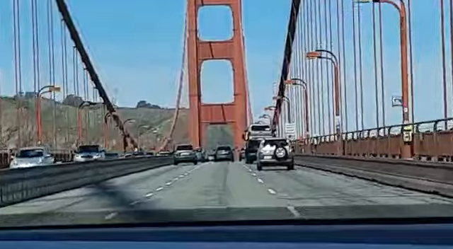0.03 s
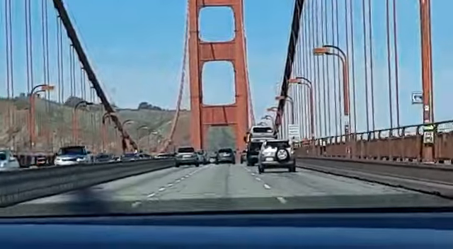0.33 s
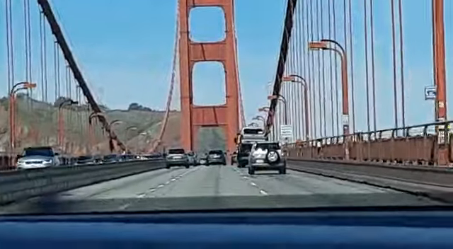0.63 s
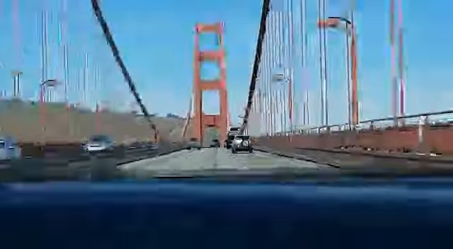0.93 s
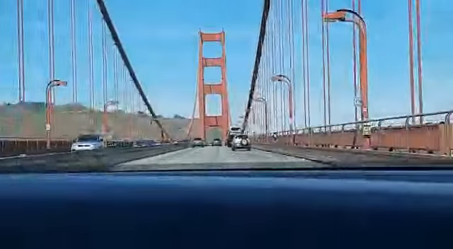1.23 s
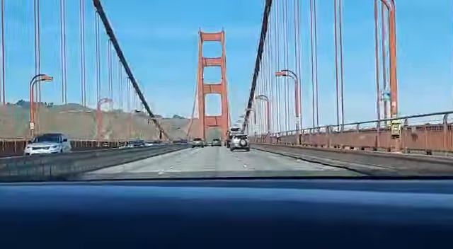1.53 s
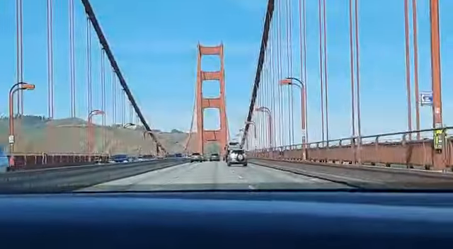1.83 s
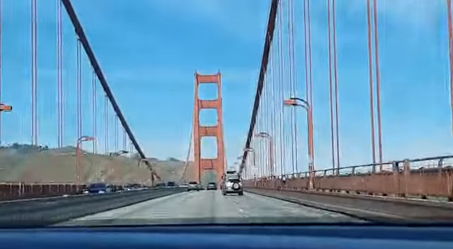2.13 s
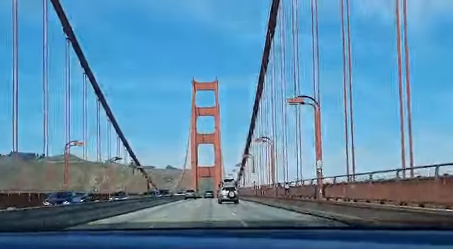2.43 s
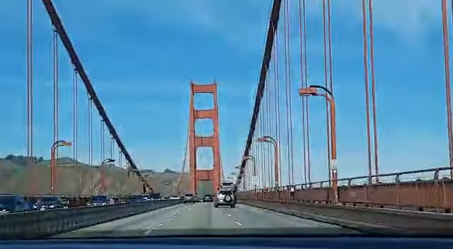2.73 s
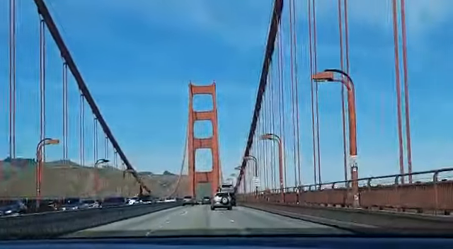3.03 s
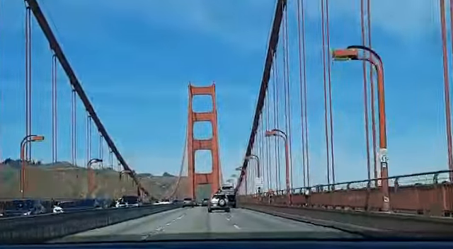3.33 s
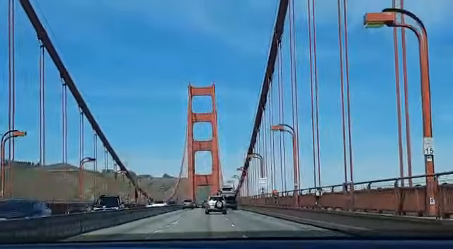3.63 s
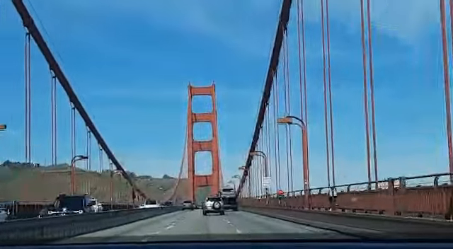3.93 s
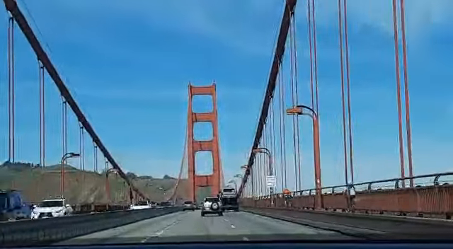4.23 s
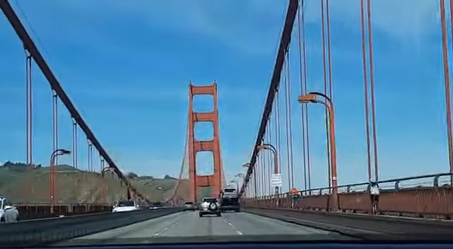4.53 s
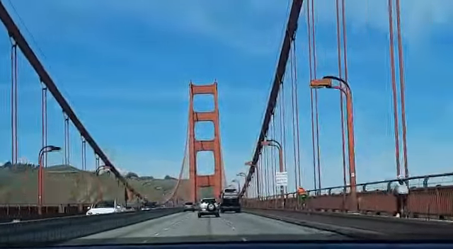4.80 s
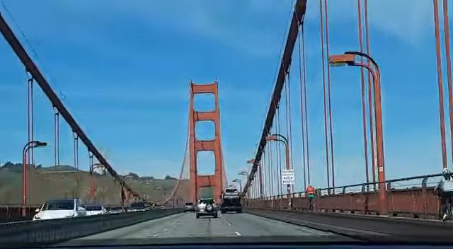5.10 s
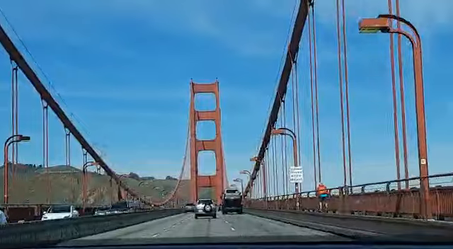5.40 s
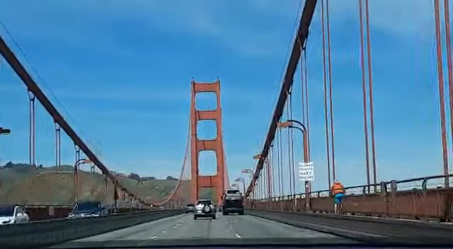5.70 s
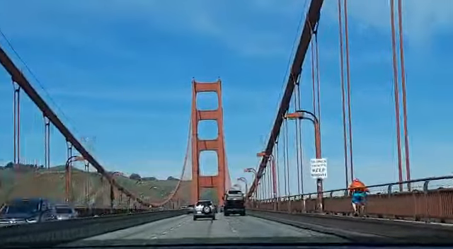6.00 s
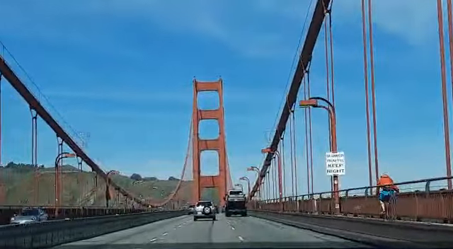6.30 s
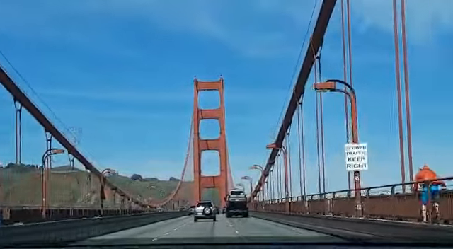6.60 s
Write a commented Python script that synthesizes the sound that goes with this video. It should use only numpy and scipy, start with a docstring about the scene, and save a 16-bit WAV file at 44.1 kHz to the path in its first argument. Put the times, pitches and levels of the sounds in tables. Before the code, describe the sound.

A continuous low rumble and tyre roar fill the cabin of a car crossing a bridge, heard from a hand-held phone behind the windscreen. In the first second, fingers brush the phone on the left, with small ticks and a thin swish. From 0.4 seconds the wheels thump dully over deck joints, often in pairs. The road noise swells from about 1 second. Fingers rustle faintly again near 2 seconds, then the hardest jolts land at 2.2 to 2.3 seconds, lightly buzzing the trim, and the rumble drops back. It builds again from about 3.3 seconds, with more thumps around 4.1 and 4.6 seconds. Oncoming cars add very faint swells of hiss between 1.5 and 5.2 seconds. A strong double thump at 5.8 to 5.9 seconds brings another slight buzz, after which the road sounds smoother, with one softer bump near 6.5 seconds.

```python
"""A car cruises over a bridge deck, heard from a hand-held phone behind the windscreen.
From the start the road shakes the cabin's low modes, tyres and air roar through the glass, and fingers
brush the phone's left port. From 0.4 s the axles thump over deck joints; small ticks and a thin swish
fall in the first second. Oncoming cars hiss by from 1.5 to 5.2 s. Near 2 s the fingers brush again, then
the hardest jolts buzz the trim; it buzzes once more near 5.8 s, as the last coarse stretch ends."""
import sys
import numpy as np
from scipy import signal
from scipy.fft import rfft, irfft
from scipy.io import wavfile
from scipy.ndimage import uniform_filter1d

SR = 44100
rng = np.random.default_rng(int(sys.argv[2]) if len(sys.argv) > 2 else 0)


def unload_wav(signal):
    """Save mono or channel-first audio to the path in sys.argv[1] as 16-bit WAV at rate SR, clipped to [-1, 1]."""
    wavfile.write(
        sys.argv[1],
        SR,
        np.round(np.clip(np.atleast_2d(signal).T, -1, 1) * 32767).astype(np.int16),
    )


N = 297675
TIME = np.arange(N) / SR
FREQ = np.maximum(np.arange(N // 2 + 1) * SR / N, 1)


def undb(db):
    """Decibels to gain."""
    return 10 ** (np.asarray(db) / 20)


def unit(x):
    """Scale to rms 1."""
    return x / np.sqrt(np.mean(x ** 2))


def pan(pan_db):
    """Port gains for a left-minus-right level, the nearer port at 1."""
    return undb(np.minimum([[pan_db], [-pan_db]], 0))


def surge(start_s, rise_s):
    """Envelope that peaks at 1 after rise_s, then dies away."""
    age = np.maximum(TIME - start_s, 0) / rise_s
    return age * np.exp(1 - age)


def colour(points):
    """Gain over frequency from (freq_hz, level_db) points."""
    freq_hz, level_db = np.transpose(points)
    return undb(np.interp(np.log(FREQ), np.log(freq_hz), level_db))


def resonance(centre_hz, width_hz):
    """Damped resonance, gain 1 at its centre."""
    return 1 / (1 + 1j * (FREQ / centre_hz - centre_hz / FREQ) * centre_hz / width_hz)


def body(modes):
    """Gain of independent, steep-sided modes (centre_hz, width_hz, level_db)."""
    return np.sqrt(sum(abs(undb(db) * resonance(hz, width_hz) ** 2) ** 2 for hz, width_hz, db in modes))


def noise(gain):
    """Noise of rms 1 with the given spectrum."""
    return unit(irfft(rfft(rng.standard_normal(N)) * gain, N))


def walk(rate_hz):
    """Smooth random wander, rms 1."""
    return noise(1 / (1 + (FREQ / rate_hz) ** 4))


def field(gain):
    """Cabin noise at two ports, mid rms 1: long waves reach both alike, short ones differ."""
    # freq_hz, side_minus_mid_db
    width = [(60, -18.5), (110, -28.5), (200, -10.5), (380, -6), (700, -6.5), (1290, 3), (2380, -0.5),
             (4400, 1), (8120, 3.5), (15000, -3)]
    # freq_hz, left_minus_right_db
    lean = [(110, 1.5), (200, 0), (350, 5.5), (700, 2), (1290, 6), (2200, 0), (3200, 1.5), (4400, -1),
            (15000, 0.5)]
    mid, side = rfft(rng.standard_normal((2, N))) * gain
    sign = np.array([[1], [-1]])
    spectra = mid + sign * side * colour(width)
    pair = irfft(spectra * colour(lean) ** (sign / 2), N)
    return pair / np.std(pair.mean(axis=0))


def reflections(ripple_db=1.67, count=90):
    """Echoes between glass and dashboard leave a fine, steady ripple on the spectrum."""
    lags_s = rng.uniform(0.0024, 0.027, count)
    echoes = np.zeros(N)
    echoes[(lags_s * SR).astype(int)] = rng.standard_normal(count)
    return undb(ripple_db * unit(rfft(echoes).real))


def shaken(modes, hold_s):
    """Random ringing of modes, held to an even strength."""
    ring = field(body(modes))
    power = uniform_filter1d(ring.mean(axis=0) ** 2, int(hold_s * SR))
    return ring / np.sqrt(power)


def deck_drive(smooth_db, db_per_db, run_off_s=0.08):
    """A layer's gain over time: deck roughness builds slowly and drops as both axles leave it."""
    # coarse deck: start_s, end_s, build_s, roughness_db
    stretches = [(0.17, 0.88, 0.18, 0.4), (1.06, 2.248, 0.34, 4), (3.25, 5.871, 0.79, 3.5)]
    roughness_db = np.zeros(N)
    for start_s, end_s, build_s, db in stretches:
        build = np.clip((TIME - start_s) / build_s, 0, 1)
        run_off = np.clip((end_s - TIME) / run_off_s + 0.5, 0, 1)
        roughness_db += db * build * run_off
    return undb(smooth_db + db_per_db * roughness_db)


def air(gust_db=1.0, half_power_s=0.1):
    """Faint, gusty window hiss; swells on coarse deck and as each oncoming car passes."""
    # hiss spectrum: freq_hz, level_db
    hiss = [(2500, -1.5), (4000, 11), (5200, -1), (6500, 1.5), (8800, 3), (11300, 10), (13500, 4),
            (15800, -7)]
    # cars beyond the barrier: abreast_s, level_db
    passes = [(1.47, -77), (1.83, -78), (3.87, -82.5), (4.15, -78.5), (4.82, -79.5), (5.17, -80)]
    traffic_power = sum(undb(db) ** 2 / (1 + ((TIME - abreast_s) / half_power_s) ** 2)
                        for abreast_s, db in passes)
    strength = np.sqrt(deck_drive(smooth_db=-85.5, db_per_db=0.86) ** 2 + traffic_power)
    return field(colour(hiss) * reflections()) * strength * undb(gust_db * walk(8))


def swish(start_s=0.593, end_s=0.92, rise_s=0.02, release_s=0.08,
          level_db=-57, sag_db_per_s=36, grain_db=1.5):
    """A thin, grainy swish rises after a tick, sags and lets go."""
    age_s = np.maximum(TIME - start_s, 0)
    gate = np.clip(np.minimum(age_s / rise_s, (end_s - TIME) / release_s), 0, 1)
    envelope = gate * undb(level_db - sag_db_per_s * age_s + grain_db * walk(120))
    spectrum = colour([(2500, -15), (4800, -1), (6500, -6), (8500, -9), (10600, -3), (12200, 5.5),
                       (14000, -6), (16000, -9)])
    return np.array([noise(spectrum), noise(spectrum)]) * envelope * pan(3)


def rattles(grain_db=1.5):
    """Loose trim buzzes faintly at hard jolts."""
    # buzzes: start_s, level_db, rise_s, pan_db
    jolts = [(2.185, -55, 0.026, 0), (2.307, -56, 0.028, -1.5), (5.785, -59.5, 0.033, -2),
             (5.895, -54, 0.011, -6)]
    buzz = field(colour([(900, -12), (2200, 14), (4000, -6.5), (6000, 0), (8500, -14.5),
                         (12500, -9.5), (16000, -20)]))
    grain = unit(undb(grain_db * walk(250)))
    envelope = sum(undb(db) * surge(start_s, rise_s) * pan(pan_db)
                   for start_s, db, rise_s, pan_db in jolts)
    return buzz * grain * envelope


def ticks(size=1024, scrape_gain=0.091, scrape_s=0.00069):
    """A tap with a brief scrape rings one heavily damped resonance."""
    # case and trim contacts: start_s, peak_db, pitch_hz, decay_s, pan_db
    taps = [(0.071, -30, 6000, 0.000082, 27), (0.069, -21.5, 720, 0.0008, 20),
            (0.0813, -25, 2300, 0.0001, 3), (0.356, -25, 806, 0.0008, -17), (0.5950, -34, 8200, 0.0001, 22),
            (0.7355, -29.5, 2470, 0.00036, -28), (0.735, -23.5, 870, 0.00096, -6),
            (0.9403, -36, 8450, 0.00004, -23), (2.371, -42, 12500, .0001, 29),
            (2.373, -45, 12400, 0.000088, 19), (5.912, -46.5, 5000, .00014, -23)]
    out, age_s = np.zeros((2, N + size)), TIME[:size]
    for start_s, peak_db, pitch_hz, decay_s, pan_db in taps:
        contact = (age_s == 0) + scrape_gain * rng.standard_normal(size) * np.exp(-age_s / scrape_s)
        mode = age_s * np.exp(-age_s / decay_s) * np.sin(2 * np.pi * pitch_hz * age_s)
        ring = np.convolve(contact, mode)[:size]
        first = int(start_s * SR)
        out[:, first:first + size] += ring / abs(ring).max() * undb(peak_db) * pan(pan_db)
    return out[:, :N]


def fingers(grain_db=1.5, catch_s=0.004, release_s=0.016):
    """Skin sticks and slips on the case in grainy strokes that catch fast and let go softly."""
    # friction spectrum: freq_hz, level_db
    skin = [(900, -20), (2000, -3.5), (2700, -0.5), (5500, -2), (8700, -9.5), (10000, -3), (12300, 2),
            (14500, -3), (16000, -6)]
    # brushing or resting: start_s, end_s, level_db, tilt_db_per_octave, pan_db
    rubs = [(0.068, 0.1, -40, -1, 28), (0.085, 0.21, -49, 0.5, 24), (0.108, 0.19, -34, -5, 15),
            (0.0, 2.39, -74.5, 0, 1.5), (1.932, 2.112, -52, -1, 20), (2.1, 2.26, -61, -2, 18.5),
            (2.2, 2.235, -54, 0, 16)]
    out = np.zeros((2, N))
    for start_s, end_s, level_db, tilt_db_per_octave, pan_db in rubs:
        corners_s = [start_s, start_s + catch_s, end_s - release_s / 2, end_s + release_s / 2]
        stroke = np.interp(TIME, corners_s, [0, 1, 1, 0])
        spectrum = colour(skin) * undb(tilt_db_per_octave * np.log2(FREQ / 8000))
        out += np.array([noise(spectrum), noise(spectrum)]) * stroke * undb(level_db) * pan(pan_db)
    return out * unit(undb(grain_db * walk(300)))


def tyres(throb_db=0.63, flutter_db=0.5, edge_hz=2500, brighten_db_per_s=0.86, ease_db_per_s=-0.15):
    """Tread noise drones in the panels and roars through the glass, sinking as the car eases off."""
    # panel modes: centre_hz, width_hz, level_db
    panels = [(249, 200, -9), (289.8, 59, -4.5), (325.6, 39, 0.5), (378, 158, -9)]
    # roar spectrum: freq_hz, level_db
    roar_spectrum = [(200, -33.5), (430, -4), (560, 2.5), (880, 1.5), (1100, -6), (1600, -9.5),
                     (2300, -16.5), (3000, -28.5), (4000, -40.5), (5200, -57.5), (8000, -55.5)]
    from_middle_s = TIME - TIME.mean()
    drone = field(body(panels)) * deck_drive(smooth_db=-36, db_per_db=1.21) * undb(throb_db * walk(14))
    roar = field(colour(roar_spectrum) * reflections()) * undb(0.45 + flutter_db * walk(23))
    treble = irfft(rfft(roar) / (1 + (edge_hz / FREQ) ** 10), N)
    roar = roar - treble + treble * undb(brighten_db_per_s * from_middle_s)
    right_sizzle = noise(body([(6040, 780, 0.61), (5580, 2100, -2)])) * pan(-36.5) * undb(-25)
    sing = field(body([(1135, 77, 8.5), (1460, 14, 6.5), (1795, 60, -14.5)])) * undb(-15)
    tread = (roar + right_sizzle + sing) * deck_drive(smooth_db=-43.5, db_per_db=1.0)
    return (drone + tread) * undb(ease_db_per_s * from_middle_s)


def rumble(deep_patch_db=2.5, upper_patch_db=1.55, patch_hz=7):
    """Road texture shakes the cabin's low modes in uneven patches, harder on coarse deck."""
    # cabin modes, both tables: centre_hz, width_hz, level_db
    deep_modes = [(41.3, 42, -17.5), (53.3, 18, -17), (77.6, 36, -5), (95.9, 12, 4)]
    upper_modes = [(132.5, 47, -1.5), (163.9, 18, -2), (186.5, 26, -6.5)]
    deep = shaken(deep_modes, hold_s=0.11) * deck_drive(smooth_db=-25.5, db_per_db=1.15)
    deep *= undb(deep_patch_db * walk(patch_hz))
    upper = shaken(upper_modes, hold_s=0.12) * deck_drive(smooth_db=-29, db_per_db=0.99)
    upper *= undb(upper_patch_db * walk(patch_hz))
    return deep + upper


def bumps(slap_lead_s=0.019, slap_rise_s=0.011, shudder_rise_s=0.023):
    """The tread slaps a joint, then the cabin air swells into a boom while the upper modes shudder."""
    # axle at a joint or bump: start_s, boom_db, boom_hz, boom_rise_s, slap_db, shudder_db
    hits = [(0.371, -20, 89.4, 0.027, -35.5, -30), (0.968, -11.5, 93, 0.013, -37.5, -28),
            (1.582, -11.5, 95.5, 0.009, -31, -20), (1.69, -14.5, 92.7, 0.019, -32, -19.5),
            (2.191, -4, 87.7, 0.011, -25, -19.5), (2.243, -8.5, 80, 0.0098, -37.5, -24.5),
            (2.303, -2.5, 85, .016, -41, -17), (2.912, -11, 91.7, 0.023, -40.5, -29.5),
            (3.481, -17.5, 95.8, .025, -40, -27.5), (3.984, -13.5, 92.6, 0.032, -30, -21.5),
            (4.121, -5.5, 94, 0.011, -41.5, -22.5), (4.579, -14.5, 82, 0.014, -36, -24.5),
            (4.689, -11.5, 84, 0.025, -42, -18), (5.769, -10.5, 97, 0.045, -30.5, -19),
            (5.9, -4, 86.2, 0.02, -31.5, -22), (6.484, -14.5, 90, 0.024, -45, -26)]
    booms, slap_envelope, shudder_envelope = np.zeros((3, N))
    for start_s, boom_db, boom_hz, boom_rise_s, slap_db, shudder_db in hits:
        tone = np.sin(2 * np.pi * boom_hz * (TIME - start_s))
        booms += undb(boom_db) * surge(start_s, boom_rise_s) * tone
        shudder_envelope += undb(shudder_db) * surge(start_s, shudder_rise_s)
        slap_envelope += undb(slap_db) * surge(start_s - slap_lead_s, slap_rise_s)
    slap = field(colour([(100, -6.5), (300, -1), (500, -6), (750, -12.5), (1200, -26.5),
                         (3000, -40.5), (8000, -78.5)]))
    shudder = field(body([(129, 58, 0), (157, 33, -1)]))
    return booms * pan(1) + slap * slap_envelope + shudder * shudder_envelope


def scene():
    """Everything heard in the cabin."""
    return rumble() + tyres() + air() + bumps() + rattles() + fingers() + swish() + ticks()


def record(dry):
    """A few milliseconds of fade keep the start and end free of clicks; the highest treble is cut."""
    fade_s, top_hz = 0.003, 15650
    fade = np.clip(np.minimum(TIME, TIME[-1] - TIME) / fade_s, 0, 1)
    lowpass = signal.ellip(10, 0.1, 80, top_hz, fs=SR, output="sos")
    return signal.sosfilt(lowpass, dry * fade)


dry = scene()
out = record(dry)
unload_wav(out)
```